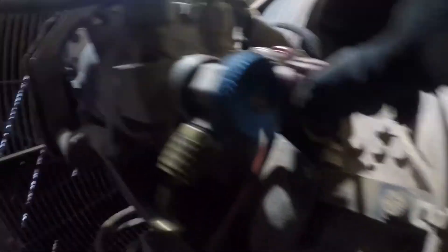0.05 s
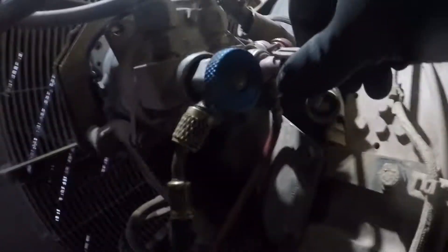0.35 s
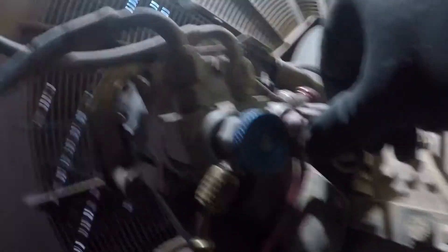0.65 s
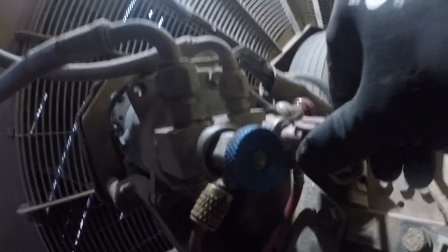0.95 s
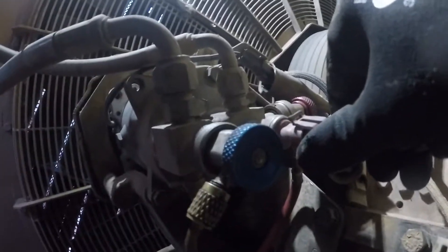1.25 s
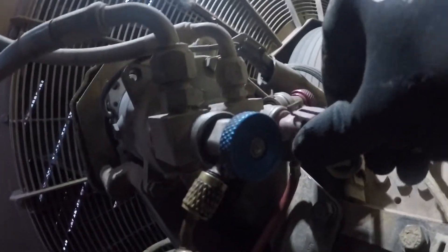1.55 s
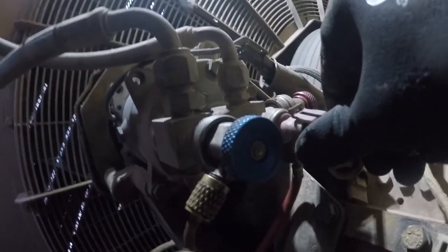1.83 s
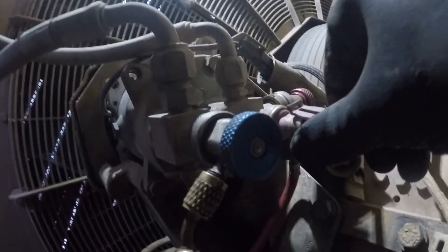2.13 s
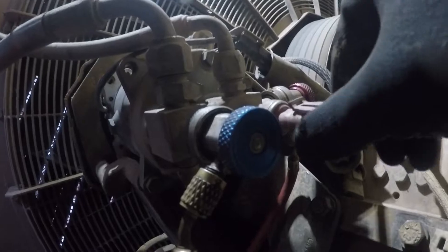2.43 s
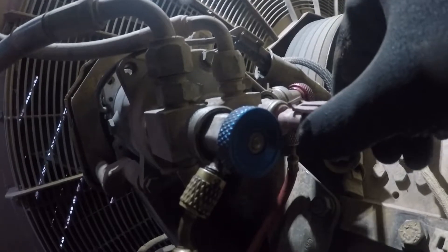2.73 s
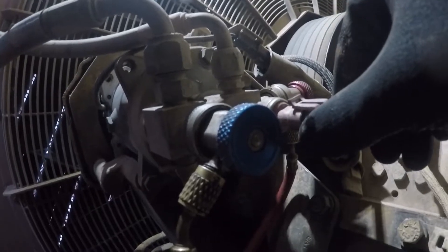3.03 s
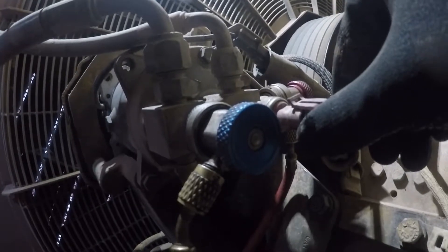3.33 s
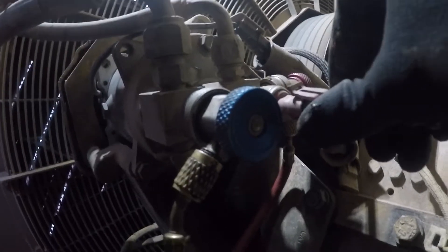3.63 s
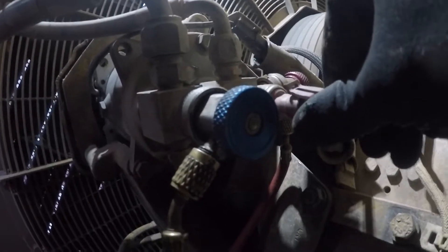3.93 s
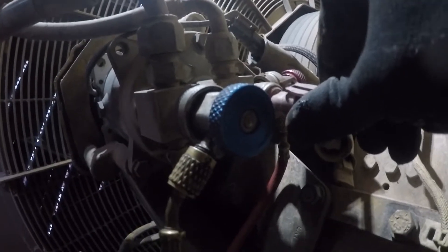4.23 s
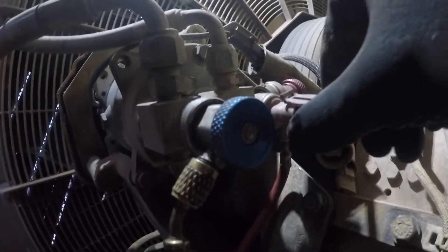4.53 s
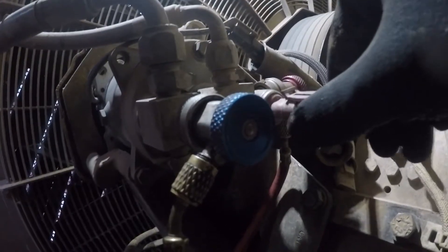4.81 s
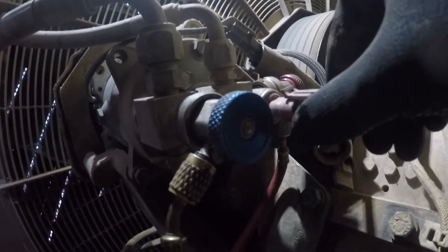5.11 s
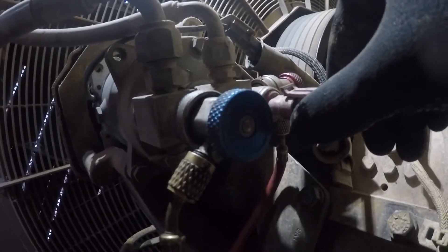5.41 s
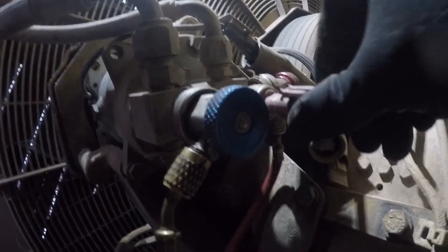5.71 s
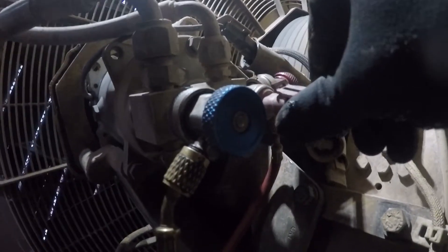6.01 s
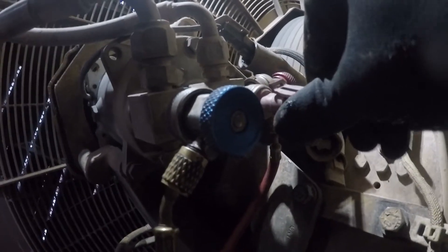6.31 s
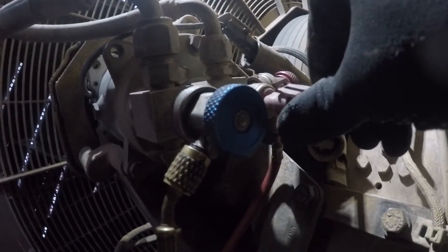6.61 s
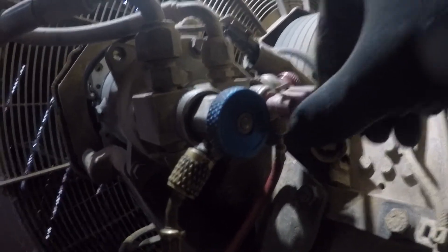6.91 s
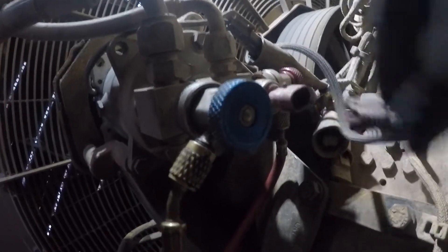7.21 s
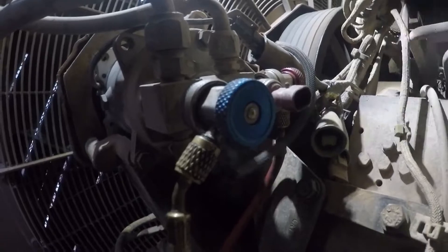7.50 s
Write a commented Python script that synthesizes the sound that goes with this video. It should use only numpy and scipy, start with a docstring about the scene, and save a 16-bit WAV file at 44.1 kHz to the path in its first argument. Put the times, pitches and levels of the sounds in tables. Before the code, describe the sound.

Close handling rubs, then four sharp, ringing metal clacks of a compressor clutch while a large machine rumbles and a plug faintly ticks.

```python
"""Beside a stopped air-conditioning compressor, heard close on the two microphone ports of a small
hand-held camera. A large machine rumbles steadily behind; fingers rub and bump the camera case, most of
all at the start. A gloved hand works a wire connector, so the plug ticks and scrapes, and four times the
magnetic clutch snaps its plate against the pulley and rings."""
import sys
import numpy as np
from scipy import signal
from scipy.fft import rfft, irfft, next_fast_len
from scipy.io import wavfile

SR = 44100
rng = np.random.default_rng(int(sys.argv[2]) if len(sys.argv) > 2 else 0)


def waveform_to_disk(signal):
    """Save audio, clipped to [-1, 1], as 16-bit WAV at the path in sys.argv[1]."""
    frames = np.transpose(np.atleast_2d(signal))
    scaled = np.clip(frames, -1, 1) * 32767
    samples = np.round(scaled).astype(np.int16)
    wavfile.write(sys.argv[1], SR, samples)


N = 341887
T = np.arange(N) / SR
HZ = np.maximum(np.fft.rfftfreq(N, 1 / SR), 1)

# modes of the camera case: f/Hz, width/Hz, level/dB
CASE_MODES = [(105, 10.3, -14.5), (168.4, 25, -22.5), (256.4, 14, -16)]


def undb(db):
    """Decibels to gain."""
    return 10 ** (np.asarray(db) / 20)


def unit(x):
    """Scale to rms 1."""
    return x / np.sqrt(np.mean(x ** 2))


def decay(t, t60):
    """A fall of 60 dB every t60 seconds."""
    return np.exp(-np.log(1000) * t / t60)


def over_hz(points, hz=HZ):
    """Read (f/Hz, value) points on a log-frequency axis."""
    at, value = np.transpose(points)
    return np.interp(np.log(hz), np.log(at), value)


def shape(x, gain):
    """Filter by a gain for every frequency."""
    n = next_fast_len(N)
    return irfft(rfft(x, n) * np.interp(np.fft.rfftfreq(n, 1 / SR), HZ, gain), n)[..., :N]


def resonance(x, hz, width_hz):
    """Two-pole band-pass."""
    return signal.lfilter(*signal.iirpeak(hz, hz / width_hz, fs=SR), x)


def band(x, hz, width_hz, widen=1):
    """Two resonances in series, the second wider by a factor."""
    return resonance(resonance(x, hz, width_hz), hz, widen * width_hz)


def pan(db):
    """Port gains for a level difference, left minus right."""
    return undb(np.array([[1], [-1]]) * db / 2)


def ports(mid, side, like):
    """Left and right port from two unrelated signals; likeness 1 is in phase, -1 opposed."""
    return (np.sqrt(1 + like) * mid + np.sqrt(1 - like) * side * np.array([[1], [-1]])) / np.sqrt(2)


def port_noise(t, like):
    """White noise with a given likeness at the two ports."""
    return ports(*rng.standard_normal((2, len(t))), like)


def add(out, start, x):
    """Mix a short sound in at a time."""
    i = int(start * SR)
    out[:, i:i + x.shape[1]] += x[:, :N - i]


def walk(rate_hz):
    """Slow random drift with a spread of 1."""
    return unit(shape(rng.standard_normal(N), (HZ > 1) / (1 + (HZ / rate_hz) ** 4)))


def slips(per_s, spread_db):
    """Stick-slip: tiny jerks at random moments, uneven in size."""
    moments = rng.random(N) < per_s / SR
    return unit(moments * rng.standard_normal(N) * undb(spread_db * rng.standard_normal(N)))


def stroke(middle, half, db):
    """A bell-shaped swell, like the pressure of one sliding movement."""
    return undb(db) * np.exp(-((T - middle) / half) ** 2 / 2)


def background_db(hushed_s=0.81, return_s=1.11, return_db_per_s=14, lift_s=6.1, lift_db_per_s=1):
    """The background sinks under the opening rubs, holds, returns and lifts a little at the end."""
    hush = np.interp(T, [0, hushed_s], [0.5, -9.5]) + return_db_per_s * np.maximum(T - return_s, 0)
    return np.minimum(hush, 0) + lift_db_per_s * np.maximum(T - lift_s, 0)


def machine(base_db=-22.5, bass_hz=240, bass_db=-0.5, throb_db=1, bass_share=0.79):
    """A large machine in the background: deep, uneven rumble under smooth hiss."""
    # spectrum of the machine and the air around it: f/Hz, level/dB
    colour = [(12, -18), (20, -0.5), (55, 1), (108, .5), (140, -7), (235, -18), (420, -30), (800, -32.5),
              (2000, -45), (3500, -52.5), (5000, -60.5), (7900, -54), (10500, -59.5), (15000, -76)]
    # how alike it reaches the two ports: f/Hz, likeness
    likeness = [(60, -0.31), (130, -0.44), (290, 0.87), (640, -0.36), (1410, -0.27), (3090, 0.3),
                (6800, 0.73), (15000, 1)]
    # its balance: f/Hz, left minus right/dB
    balance = [(60, -9), (110, -10.5), (200, -2.5), (380, -4), (700, -3), (1290, 2.5), (2380, 0),
               (4390, -0.5), (8110, -3), (15000, 2.5)]
    spectrum = ports(*rfft(rng.standard_normal((2, N))), over_hz(likeness))
    sound = irfft(spectrum * pan(over_hz(balance)) * undb(over_hz(colour)) * (HZ > 12), N)
    sound = sound * undb(base_db) / np.std(sound.mean(axis=0))
    bass = shape(sound, 1 / (1 + (HZ / bass_hz) ** 4))
    dip_db = -18 * stroke(middle=0.71, half=0.03, db=0)  # the bass dips after the last opening rub
    throb = undb(bass_db + throb_db * walk(rate_hz=23) + dip_db)
    level_db = background_db()
    return undb(level_db) * (sound - bass) + undb(bass_share * level_db) * throb * bass


def slide(start, attack, length, db, release_s=0.016):
    """Pressure of a finger on the case: it swells, holds and lets go."""
    swell = np.sin(np.pi / 2 * np.clip((T - start) / attack, 0, 1)) ** 2
    return undb(db) * swell * np.exp(-np.maximum(T - start - length, 0) / release_s)


def fingers(creep_db=-26, creep_until_s=0.31, creep_fade_s=0.26):
    """Forces on the case: pressing booms, rustles and scratches; gliding squeaks and rasps a little."""
    # fingers pressing along the case: t/s, attack/s, length/s, level/dB, relative scratch/dB,
    # relative rustle/dB
    rubs = [(-.03, 0.023, 0.11, -16, -19, -14.5), (0.092, 0.014, .02, -27, -18, -6),
            (0.146, 0.028, 0.039, -17.5, -20.5, -17), (0.197, 0.011, 0.0086, -18.5, -23, -6),
            (0.371, 0.022, 0.055, -20, -45, -23), (0.422, 0.056, 0.062, -12, -42, -23),
            (0.5, 0.016, 0.02, -24.5, -40, -13), (0.613, 0.027, 0.04, -12, -27, -17.5),
            (7.35, 0.018, 0.21, -29.5, -48, -23), (7.589, 0.021, 0.2, -28, -16.5, -25)]
    # fingers gliding lightly: middle t/s, half length/s, level/dB, relative rasp/dB
    glides = [(0.042, 0.049, -43, -23), (0.116, 0.006, -34, -24), (0.213, 0.014, -44, -8),
              (0.287, 0.014, -38.5, -13), (0.333, 0.01, -41.5, -16), (0.394, 0.0084, -44, -27),
              (0.526, 0.0066, -32, -28), (3.508, 0.007, -37, -25), (6.852, 0.01, -38, -25),
              (7.384, 0.011, -37, -30), (7.432, 0.008, -36.5, -26), (7.467, 0.0092, -38, -25),
              (7.512, 0.011, -37, -25), (7.545, 0.01, -42, -25), (7.667, 0.007, -35.5, -32),
              (7.694, 0.0042, -39, -27)]
    press = sum(slide(*timing, db) for *timing, db, _, _ in rubs)
    scratch = sum(slide(*timing, db + scratch_db) for *timing, db, scratch_db, _ in rubs)
    rustle = sum(slide(*timing, db + rustle_db) for *timing, db, _, rustle_db in rubs)
    glide = sum(stroke(*timing, db) for *timing, db, _ in glides)
    glide_rasp = sum(stroke(*timing, db + rasp_db) for *timing, db, rasp_db in glides)
    # the hand keeps creeping on the case until the camera is steady
    creep = undb(creep_db) * np.exp(-np.maximum(T - creep_until_s, 0) / creep_fade_s)
    force = (press + creep) * undb(walk(rate_hz=25))
    squeak = glide + undb(-26) * press + undb(-21) * creep
    rasp = glide_rasp + undb(-17) * scratch
    return force, squeak, rasp, scratch, rustle


def case_boom(force):
    """The rubbed case shakes the microphone and rings on for a moment after each stroke."""
    # motion that pushes both ports alike: f/Hz, level/dB
    push_colour = [(20, -14), (45, -22), (75, -8.5), (119, 6.5), (205, -21), (262, 1), (355, -31.5),
                   (587, -10.5), (750, -50), (1000, -33), (1500, -43), (3000, -45), (6500, -89)]
    # motion that rocks them against each other: f/Hz, level/dB
    rock_colour = [(25, -4), (70, -7), (115, 6), (165, -10), (210, -21), (262, -4.5), (320, -18.5),
                   (420, -6.5), (580, -11), (760, -24.5), (1150, -19), (2200, -40.5), (3500, -66)]
    push = undb(-11) * unit(shape(slips(5000, 0.39), undb(over_hz(push_colour))))
    rock = unit(shape(slips(5000, 1.3), undb(over_hz(rock_colour)) / (1 + (HZ / 4500) ** 6)))
    boom = force * (push + rock * np.array([[1], [-1]]))
    boom += (pan(-9) - 0.5) * resonance(boom, 95, 109)  # the deepest part favours the right port
    jerks = slips(5000, 5.8)
    for hz, width_hz, db in CASE_MODES:
        steady, driven = band(np.array([jerks, force * jerks]), hz, width_hz, widen=5)
        boom += undb(db) * driven / np.std(steady)
    return boom


def skin_squeak(hz=1215, width_hz=175, tone_db=4, waver=0.0234, lead_rad=2.67):
    """Skin slips in step with a mode of the case: a wavering pitch in narrow noise."""
    friction = unit(band(ports(slips(3000, 3.9), slips(3000, 1.6), like=-0.89), hz, width_hz, widen=2))
    phase = 2 * np.pi * np.cumsum(hz * (1 + waver * walk(rate_hz=90))) / SR
    tone = unit(np.sin(phase + np.array([[lead_rad], [0]])))
    return unit(friction + undb(tone_db) * tone)


def rubbing(rasp_hz=3650, stutter_db=0.5):
    """Handling noise right at the microphone: skin sticks and slips on the camera case."""
    # higher modes of the thin shell, which rustle: f/Hz, width/Hz, level/dB
    shell_modes = [(583, 108, 7.5), (976, 110, 3.5), (1310, 215, -2.5), (1606, 160, -4.5), (2350, 220, -24)]
    # hiss of dry skin: f/Hz, level/dB
    hiss_colour = [(300, 23), (950, 16.5), (1700, 10), (2700, 9.5), (3700, -14), (5000, 0.5),
                   (7800, 1), (10000, -15), (14000, -40)]
    force, squeak_force, rasp_force, hiss_force, rustle_force = fingers()
    boom = case_boom(force)
    squeak = squeak_force * skin_squeak()
    grit = ports(slips(7000, 2.8), slips(7000, 2.5), like=0.082)
    drag = ports(slips(4000, 3), slips(4000, 3), like=-0.7)
    shell = sum(undb(db) * band(drag, hz, width_hz, widen=3) for hz, width_hz, db in shell_modes)
    rustle = rustle_force * unit(shell)
    rasp = rasp_force * unit(band(grit, rasp_hz, 600, widen=1.5))
    hiss = hiss_force * unit(shape(grit, undb(over_hz(hiss_colour))))
    stutter = undb(stutter_db * walk(rate_hz=32))
    return boom + stutter * (squeak + rasp + rustle) + hiss


def fidgets(from_s=2.6, per_s=3.5, first_db=-33.5, growth_db_per_s=1.9, edge_hz=380, fall_s=0.0055):
    """Faint shifts of the grip at uneven moments, slowly firmer, as rows like the firm bumps."""
    starts = from_s + (np.arange(48) + rng.random(48)) / per_s
    levels = first_db + growth_db_per_s * (starts - from_s)
    return [(start, db, edge_hz, fall_s) for start, db in zip(starts, levels) if start < T[-1]]


def bumps(case_db=5, rise_s=0.0022, body_hz=220, pan_db=-4):
    """The grip shifts: short pushes that set the case ringing, mostly at the right port."""
    # firm bumps of the grip: t/s, level/dB, upper edge/Hz, fall/s
    firm_bumps = [(.045, -10, 380, 0.017), (.172, -8.5, 417, 0.0099), (.454, -11, 483, 0.014),
                  (0.636, -7.5, 560, 0.011), (3.503, -19, 1150, 0.0035), (4.127, -16, 318, 0.014),
                  (5.768, -17.5, 350, 0.014), (6.145, -18.5, 380, 0.011), (6.947, -19, 394, 0.01),
                  (7.273, -16, 280, 0.013), (7.31, -33, 900, 0.005), (7.356, -16, 695, 0.0054),
                  (7.418, -17, 450, 0.012), (7.545, -15, 240, 0.013), (7.609, -23, 620, .008),
                  (7.68, -16, 258, 0.0088), (7.722, -26, 750, 0.0059)]
    out, t = np.zeros((2, N)), np.arange(SR // 8) / SR
    for start, db, edge_hz, fall_s in firm_bumps + fidgets():
        push = resonance(port_noise(t, like=-0.88), body_hz, edge_hz)
        push = signal.lfilter(*signal.butter(3, [110, edge_hz], "band", fs=SR), push)
        push *= (1 - np.exp(-t / rise_s)) * np.exp(-t / fall_s)
        bump = push + undb(case_db) * sum(resonance(push, hz, width) for hz, width, _ in CASE_MODES)
        add(out, start, undb(db) * pan(pan_db) * bump / np.abs(bump).max())
    return out


def connector(tick_db=-1, tick_t60=0.035, housing_hz=2050):
    """Small plastic ticks and gritty slides as the plug is pushed and pulled."""
    # ticks of the plug: t/s, level/dB, f/Hz, width/Hz, relative level of the hollow housing/dB
    ticks = [(1.77, -42, 950, 350, -20), (2.379, -47, 13000, 3000, -20), (2.4543, -41, 3600, 500, -16),
             (4.328, -45.5, 6860, 2700, 2.5), (4.745, -42, 3850, 2600, -7), (5.193, -41, 6900, 2700, 2),
             (5.6457, -45.5, 7000, 2700, 7), (6.954, -46, 3630, 1450, 4), (6.9605, -40.5, 6650, 2600, 5.5),
             (6.977, -43, 2480, 1000, -8), (7.012, -46, 2600, 1400, -10), (7.6337, -38, 5000, 3500, -12)]
    # plug and glove sliding: middle t/s, half length/s, level/dB, f/Hz
    scrapes = [(4.987, 0.012, -47.5, 7340), (6.99, .025, -51, 7600), (7, 0.018, -52.5, 2780),
               (7.478, 0.035, -52.5, 7550), (7.612, 0.014, -56, 2880), (7.636, 0.039, -58, 4980)]
    out, t = np.zeros((2, N)), np.arange(SR // 10) / SR
    for start, db, hz, width_hz, housing_db in ticks:
        contact = port_noise(t, like=0.53)
        tick = unit(band(contact, hz, width_hz))
        housing = undb(housing_db) * unit(band(contact, housing_hz, 1400))
        add(out, start, undb(db + tick_db) * (tick + housing) * decay(t, tick_t60))
    grit = ports(slips(2700, 1.2), slips(2500, 2.6), like=0.74)
    for middle, half, db, hz in scrapes:
        out += stroke(middle, half, db) * unit(band(grit, hz, 0.45 * hz))
    return out


def mode_weights(t, count=200, spacing_hz=129.5, sparse_from_hz=4000, sparse_share=0.53):
    """Weight of every frequency in the metal: dense below, glinting partials in the treble."""
    hz = np.fft.rfftfreq(len(t), 1 / SR)
    partials = (np.arange(count) + rng.random(count)) * spacing_hz
    lines = np.histogram(partials, np.append(hz, SR))[0] * spacing_hz / hz[1]
    share = sparse_share * (hz > sparse_from_hz)
    return np.sqrt(1 - share + share * lines)


def clang(t, weights, build_cycles=0.96):
    """Dense metal modes in third-octave bands; the low ones take longer to fill the housing."""
    # the crowd of weak, close modes: f/Hz, level/dB, t60/s, left minus right/dB, likeness of the ports
    crowd = [(362, -8.5, 0.48, -2, 0.19), (575, 1.5, 0.24, -7.5, 0.57), (774, 9, 0.22, -26, -0.93),
             (845, 0, 0.16, 14, 0.44), (1170, -16, 0.45, -6.5, -0.15), (1720, -3, 0.038, 17, -0.24),
             (2370, -3, 0.14, -3, 0.36), (3260, -16, 0.16, 4.5, 0.84), (4700, -13.5, 0.043, -3, 0.63),
             (5130, -17, 0.16, -1, 0.17), (7600, -14, 0.15, -3, 0.98), (8700, -20.5, 0.14, -4, 0.023),
             (12600, -26.5, 0.051, 4, 0.95), (15900, -43, 0.053, 0, .85)]
    crowd, n = np.array(crowd), len(t)
    hz = np.maximum(np.fft.rfftfreq(n, 1 / SR), 1)
    db, pan_db, like = (over_hz(crowd[:, [0, k]], hz) for k in (1, 3, 4))
    phases = np.exp(2j * np.pi * rng.random((2, len(hz))))
    spectrum = ports(*phases, like) * weights * undb(db) * pan(pan_db) * np.sqrt(n)
    out = 0
    for centre in 315 * 2 ** (np.arange(18) / 3):
        third = irfft(spectrum * np.maximum(1 - 3 * np.abs(np.log2(hz / centre)), 0), n)
        t60 = over_hz(crowd[:, [0, 2]], centre)
        out += third * decay(t, t60) * (1 - np.exp(-t * centre / build_cycles))
    return out


def mode(t, hz, db, t60, pan_db, lead_rad, turn=0):
    """One fading partial of the plate at the two ports."""
    phase = 2 * np.pi * (hz * t + turn) + np.array([[lead_rad], [0]])
    return undb(db) * pan(pan_db) * decay(t, t60) * np.sin(phase)


def ring(t, build_s, low_db, treble_db, shift_hz, beat_hz, twin_db, build_hz=740, scatter_db=1.7):
    """The plate's clear modes; the low ones swell while it seats, the main one beats against a twin."""
    # modes of plate and pulley, the main one first: f/Hz, level/dB, t60/s, left minus right/dB,
    # phase between the ports/rad
    plate_modes = [(736, -4, 0.24, -0.5, 0.95), (592, -12.5, 0.12, -20, .5), (623, -9, 0.094, 0, 1.3),
                   (667, -11, 0.09, 11, 1.3), (790, -8, 0.13, -4, 2.8), (843, -6, 0.08, -1, 3.9),
                   (944, -9.5, 0.15, 6, 1.5), (999, -9.5, 0.16, 5.5, 2), (1150, -23, 0.084, -5, 1.3),
                   (1687, -16.5, 0.14, -4, 1.2), (1790, -14, 0.042, 26, 1.9), (1926, -9, 0.063, 0, 0.86),
                   (2245, -18.5, 0.067, 17, 0.61), (2425, -23.5, 0.2, 16, 3.7),
                   (2472, -6.5, 0.089, 2, 0.78), (2663, -13, 0.068, 4, 0.5), (2920, -19.5, 0.069, 12, 0.4),
                   (3600, -22, 0.095, -3, 0.52), (4320, -17, 0.054, 2, 0.43), (4740, -16, 0.043, -6, 0.89),
                   (6030, -27, 0.083, -17, 1.3), (6130, -15, 0.08, 7, 2.1), (7130, -25, 0.072, 0, .8),
                   (7460, -13, 0.054, -10, 2.7), (7740, -27, 0.1, -4, 0.72), (7810, -19.5, 0.13, 0, 0.37),
                   (8030, -25, 0.094, -1, 0.55), (9230, -30.5, 0.12, 0, 0.56), (11450, -42, 0.12, 0, 0.5),
                   (11960, -41, 0.1, 0, 0.5), (12300, -34, 0.12, 0, 0.5)]
    out = 0
    for k, (hz, db, *rest) in enumerate(plate_modes):
        size, turn = rng.standard_normal(2)
        db += over_hz([(3000, low_db), (4200, treble_db)], hz)
        if k == 0:
            twin = mode(t, hz + shift_hz - beat_hz, db + twin_db, *rest)
            wave = mode(t, hz + shift_hz, db, *rest) - twin
        else:
            wave = mode(t, hz + shift_hz, db - scatter_db * size, *rest, turn=0.12 * turn)
        out += wave * (1 - np.exp(-(t * hz / (build_s * build_hz)) ** 2))
    return out


def clutch(edge_hz=1250, face_hz=3000, crack_s=0.00036, clack_hz=720, clack_s=0.0065, reverb_t60=0.42):
    """The magnet pulls the plate in: its edge hits with a thin crack, then its face with a clack."""
    # snaps of the clutch: t/s, level/dB, ring/dB, treble/dB, delay until the plate lands flat/s,
    # shift of the modes/Hz, beat of the main mode/Hz, relative level of its twin/dB
    snaps = [(1.5806, 0.5, -0.95, 1, 0.0082, 1, 13, -3), (4.0023, 2.2, -0.9, 0.5, 0.0081, 1.5, 13.7, -0.5),
             (6.0167, 3, -1.5, -1, .0094, 4, 13.2, -2), (6.62, 1.8, -3, 2, 0.011, -12, 29.5, 1)]
    out, t = np.zeros((2, N)), np.arange(SR // 2) / SR
    weights = mode_weights(t)
    for start, db, ring_db, treble_db, delay, *seating in snaps:
        # both contacts excite the same metal, so their short spacing combs its spectrum
        metal = clang(t, weights)
        edge = signal.lfilter(*signal.butter(2, edge_hz, "high", fs=SR), metal)
        edge += (undb(treble_db) - 1) * resonance(edge, 5600, 3400)
        face = signal.lfilter(*signal.butter(1, face_hz, fs=SR), metal)
        crack = unit(band(port_noise(t, like=0.26), 7800, 7000)) * np.exp(-t / crack_s)
        # the surroundings answer faintly
        reverb = unit(resonance(rng.standard_normal((2, len(t))), 1200, 2000)) * decay(t, reverb_t60)
        modes = ring(t, 0.96 * delay, ring_db, treble_db, *seating)
        clack = unit(band(port_noise(t, like=-0.3), clack_hz, 520))
        clack *= (1 - np.exp(-t * clack_hz)) * np.exp(-t / clack_s)
        add(out, start, undb(db) * (undb(-8) * edge + undb(ring_db - 11) * modes + undb(-50) * reverb))
        add(out, start + 0.002, undb(db - 17) * crack)
        add(out, start + delay, undb(db) * (undb(-13) * face + undb(-15) * clack))
    return out


def scene():
    """Everything as it reaches the two microphone ports."""
    return clutch() + connector() + rubbing() + bumps() + machine()


def record(dry):
    """The camera fades in and out within milliseconds, rounds the highest peaks and cuts the top."""
    fade_s, top_hz = 0.004, 15000
    faded = dry * np.sin(np.pi / 2 * np.minimum(np.minimum(T, T[-1] - T) / fade_s, 1)) ** 2
    rounded = faded / (1 + faded ** 6) ** (1 / 6)
    return signal.sosfilt(signal.ellip(8, 0.2, 80, top_hz, fs=SR, output="sos"), rounded)


dry = scene()
out = record(dry)
waveform_to_disk(out)
```